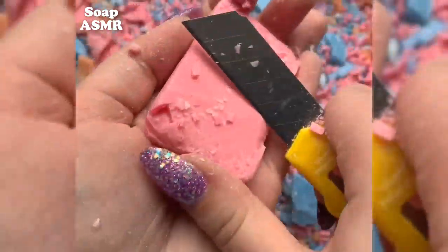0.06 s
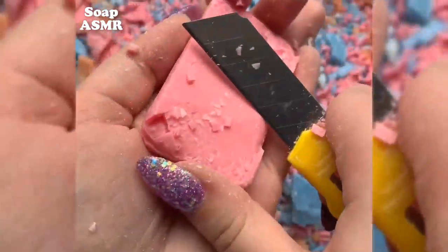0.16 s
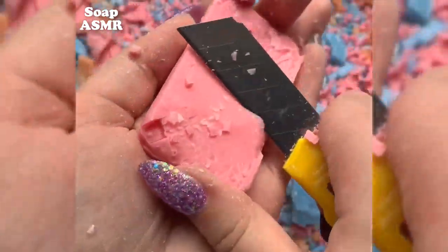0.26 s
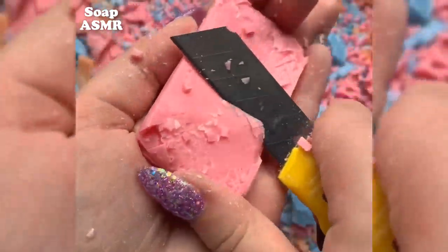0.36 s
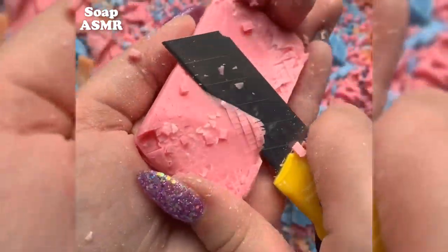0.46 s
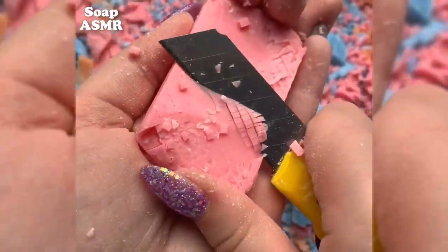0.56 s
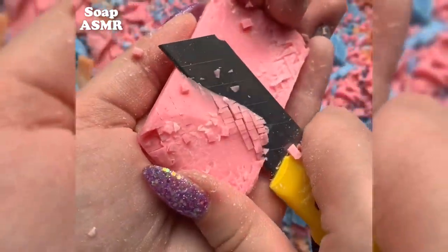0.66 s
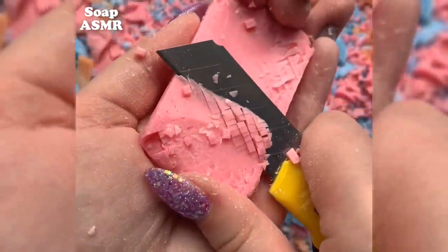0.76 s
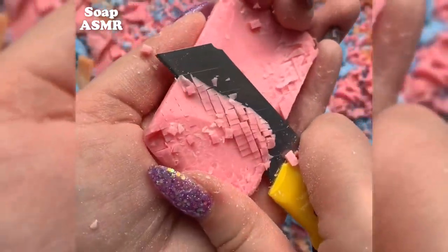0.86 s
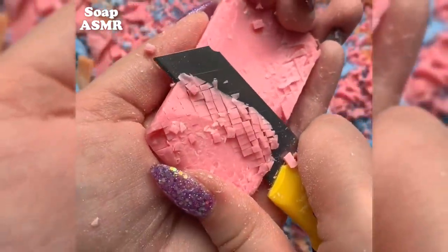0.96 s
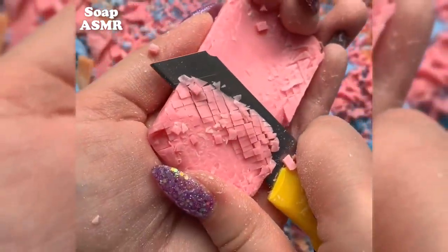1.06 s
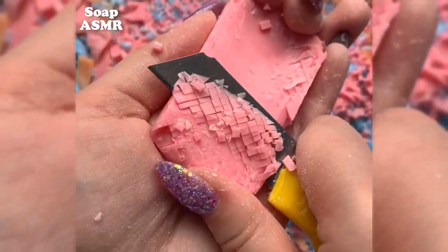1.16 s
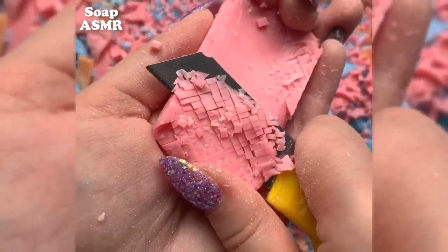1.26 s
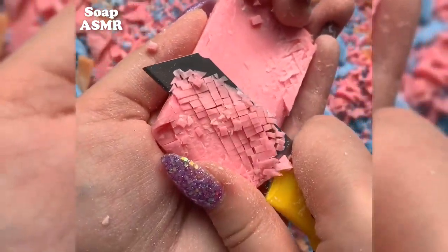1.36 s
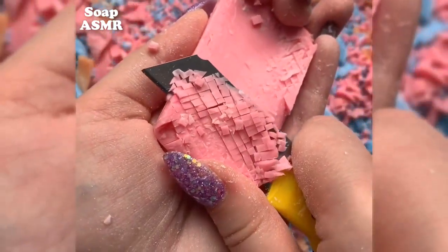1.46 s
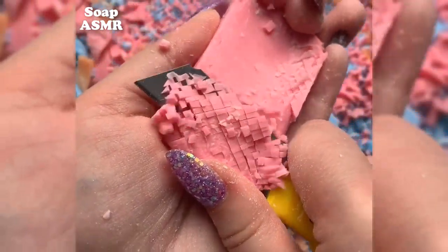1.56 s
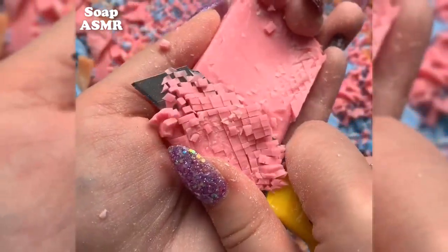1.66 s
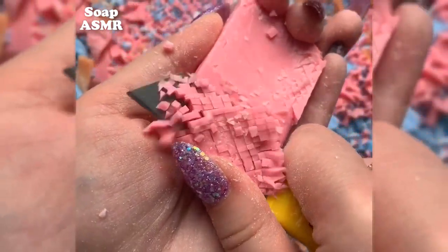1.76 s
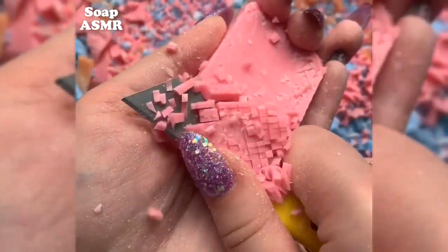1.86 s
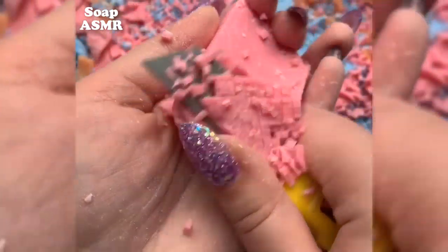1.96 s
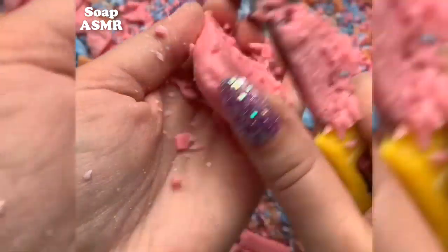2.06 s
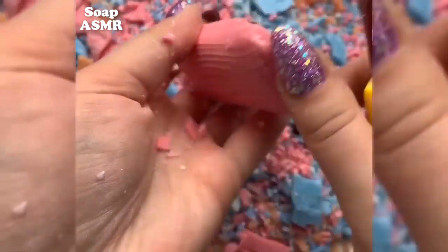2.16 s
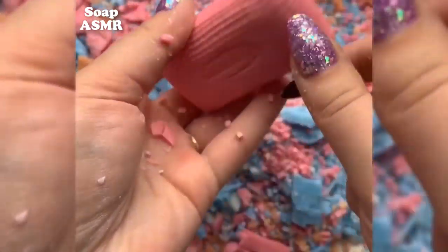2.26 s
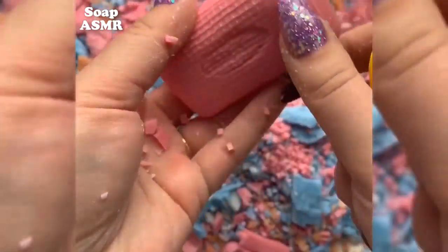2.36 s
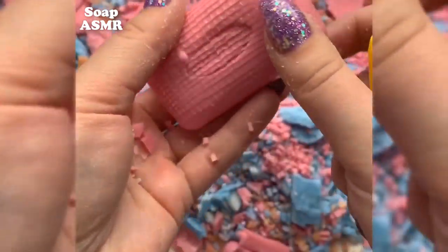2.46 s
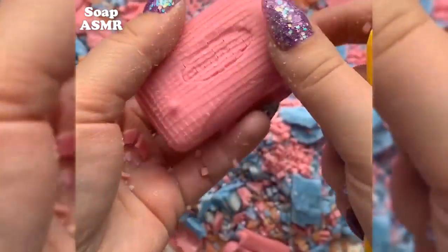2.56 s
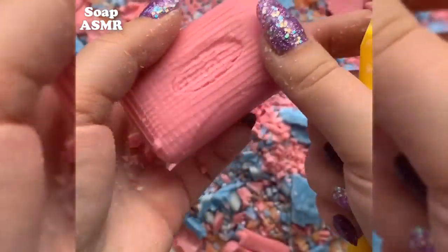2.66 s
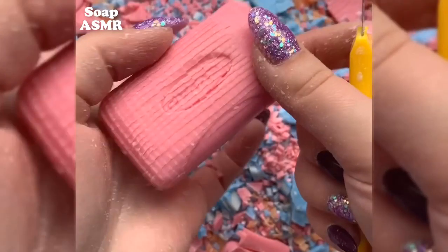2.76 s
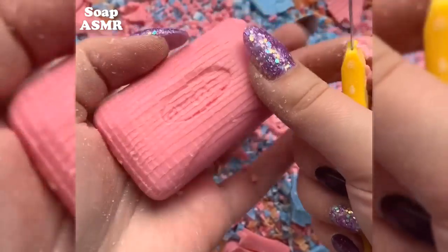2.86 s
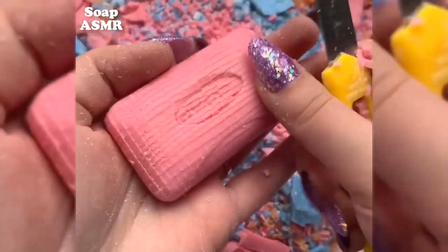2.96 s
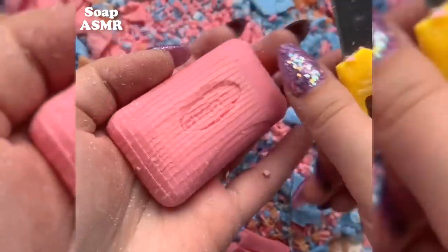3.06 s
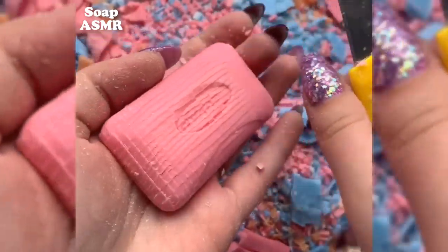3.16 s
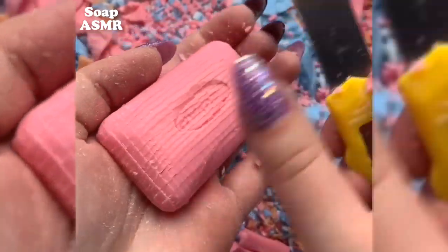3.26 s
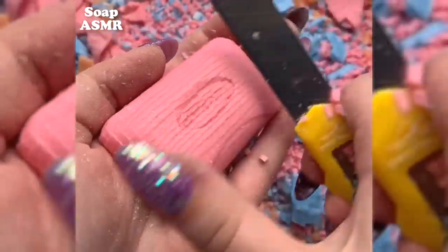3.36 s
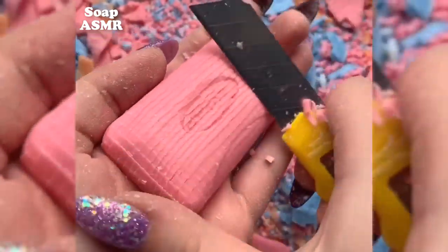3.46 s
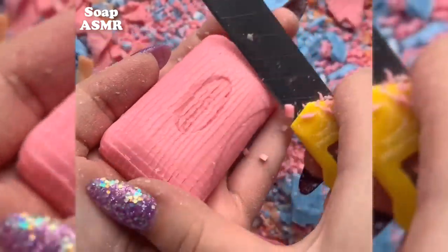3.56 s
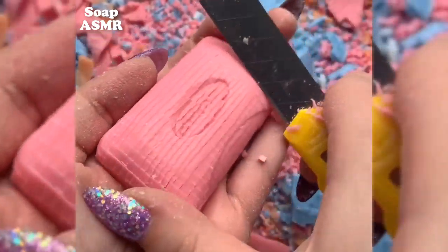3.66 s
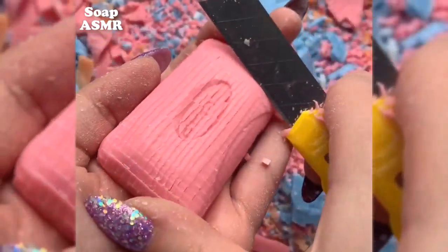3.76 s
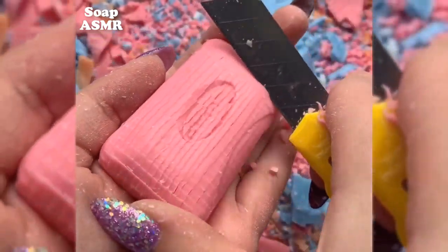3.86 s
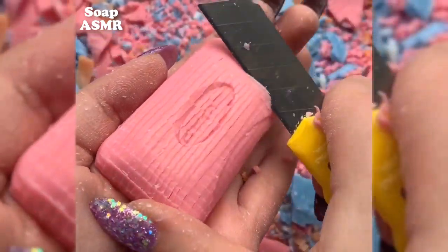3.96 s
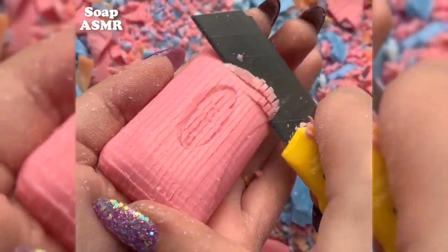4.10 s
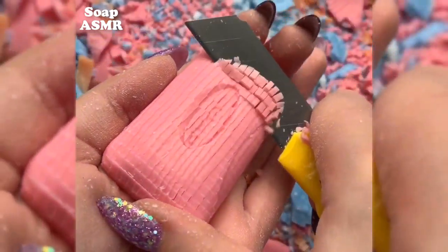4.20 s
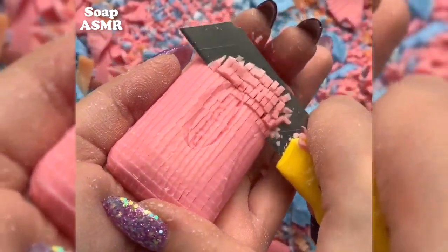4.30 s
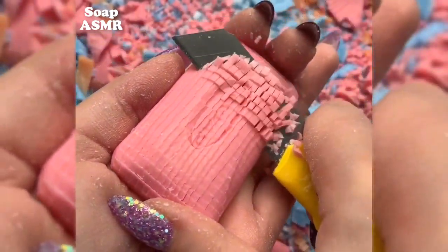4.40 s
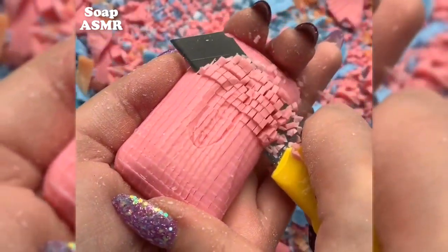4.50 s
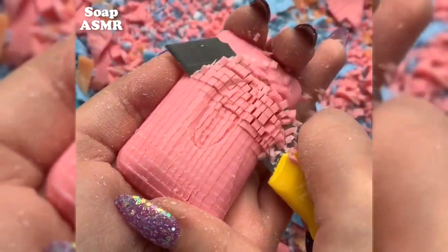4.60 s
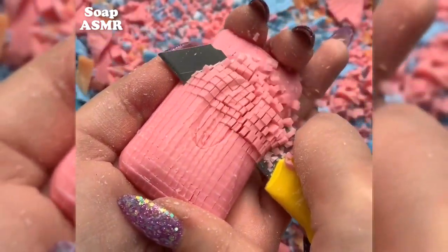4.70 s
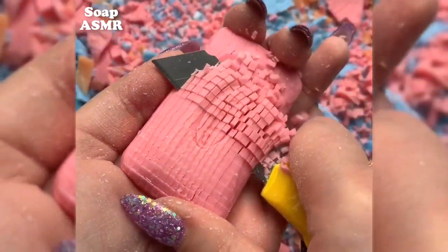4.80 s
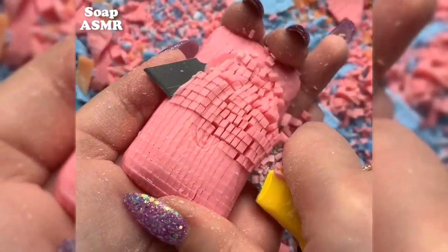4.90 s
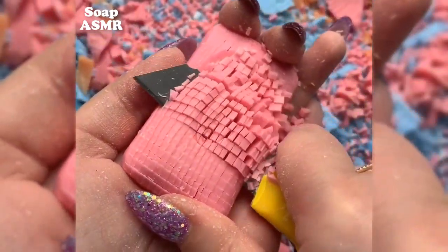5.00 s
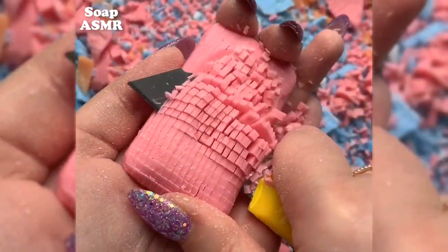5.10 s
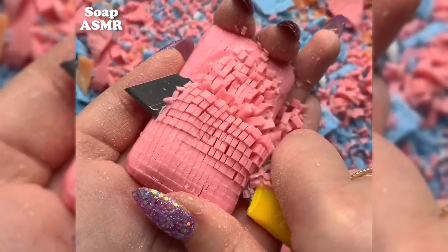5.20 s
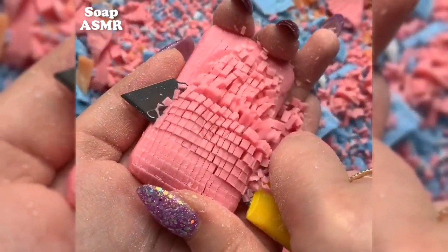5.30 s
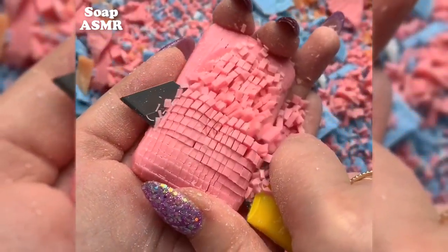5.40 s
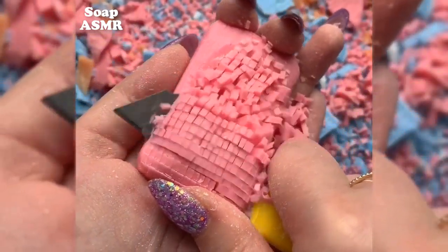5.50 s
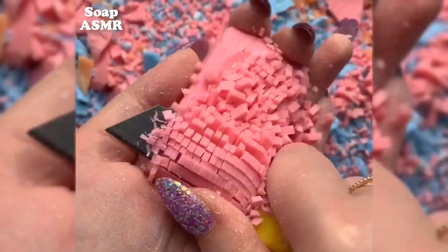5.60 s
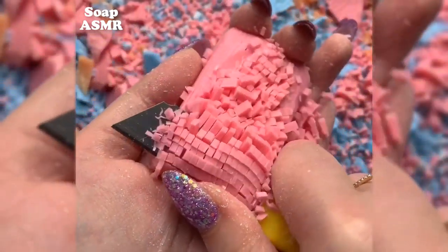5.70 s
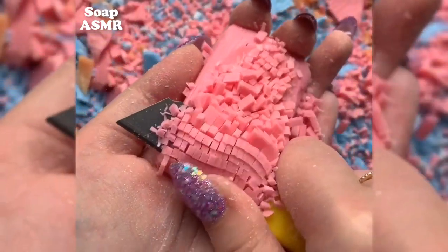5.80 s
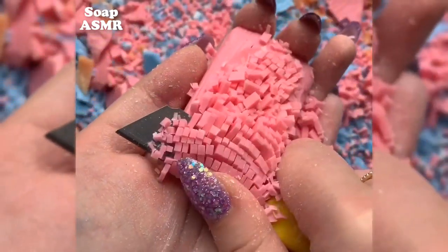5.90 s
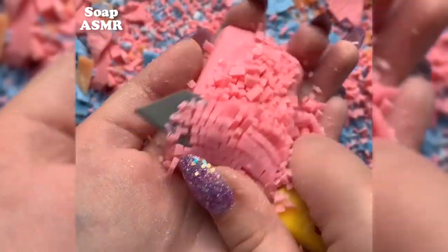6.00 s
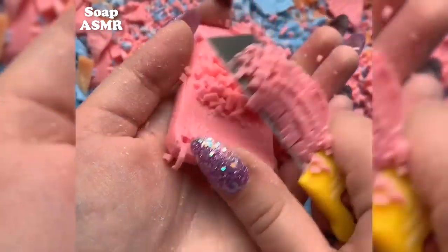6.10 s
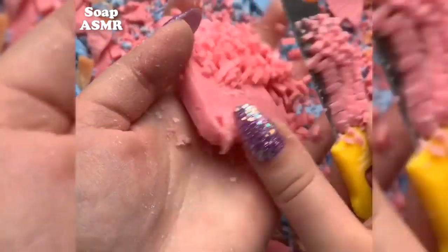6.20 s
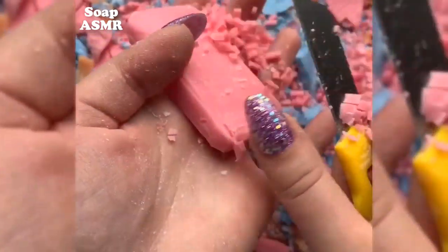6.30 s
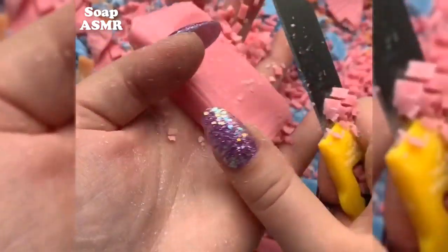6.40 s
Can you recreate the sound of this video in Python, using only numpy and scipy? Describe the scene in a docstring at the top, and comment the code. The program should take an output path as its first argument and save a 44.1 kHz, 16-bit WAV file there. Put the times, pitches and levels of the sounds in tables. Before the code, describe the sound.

Very close stereo microphones in a quiet room catch a steel blade cutting scored dry soap. A few taps lead into a short, delicate run of brittle snaps. Crumbs drop, fingers rub and the bar lands softly in the palm. After some sharper clicks, a second cut builds into a dense, bright crunch with small metallic ringing and low hand thuds, then stops, leaving rustling and ticking crumbs.

```python
"""In a quiet room, a thin steel blade shaves two scored bars of dry soap near a spaced pair of microphones.
Each cube snaps off as an impulse into the modes of edge and soap, and sets the blade's own modes ringing.
Between the cuts crumbs drop, fingers and handle tap as noise bursts into modes, and the bar lands in the palm.
Grainy noise makes the rubbing; short jolts and slower pressure swells of low noise make the hands' thuds
over a steady rumble."""
import sys
import numpy as np
from scipy import signal
from scipy.fft import rfft, irfft, next_fast_len
from scipy.io import wavfile
from scipy.ndimage import uniform_filter1d

SR = 44100
rng = np.random.default_rng(int(sys.argv[2]) if len(sys.argv) > 2 else 0)


def bounce(signal):
    """Save signal as a 16-bit WAV file at the path given by the first command-line argument."""
    frames = np.transpose(np.atleast_2d(signal))
    limited = np.clip(frames, -1, 1)
    pcm = np.round(limited * 32767).astype(np.int16)
    wavfile.write(sys.argv[1], SR, pcm)


N = 284445


def gain_of(db):
    """Logarithmic level: decibels become an amplitude factor."""
    return 10 ** (np.asarray(db) / 20)


def evened(x):
    """Power normalization: scales to rms 1 over all channels."""
    return x / np.sqrt(np.mean(x ** 2) + 1e-20)


def read_spectrum(points, hz):
    """Log-frequency interpolation: reads a curve between its listed points."""
    point_hz, value = np.transpose(points)
    return np.interp(np.log(hz + 1), np.log(point_hz + 1), value)


def follow(rows, column=1):
    """Linear interpolation: a curve's column at every sample."""
    rows = np.array(rows)
    return np.interp(np.arange(N) / SR, rows[:, 0], rows[:, column], left=rows[0, column])


def hiss(spectrum, likeness, size=1024):
    """Partial coherence: two channels of coloured noise share a part set by their likeness; rms 1."""
    hz = np.fft.rfftfreq(size, 1 / SR)
    a, b, c, d = rng.standard_normal((4 * N // size + 5, len(hz), 4)).T
    likeness = np.clip(read_spectrum(likeness, hz), -1, 1)[:, None]
    left = a + 1j * b
    right = likeness * left + np.sqrt(1 - likeness ** 2) * (c + 1j * d)
    coloured = np.array([left, right]) * gain_of(read_spectrum(spectrum, hz))[:, None]
    noise = signal.istft(coloured, nperseg=size, noverlap=3 * size // 4)[1]
    return evened(noise[:, :N])


def rings(modes, events, blow_s, spread, size=512, after=0., pitch=1):
    """Modal excitation: an uneven blow with a crumbly aftermath drives damped modes; energy 1 an event."""
    t = np.arange(size) / SR
    chance = rng.standard_normal((events, 2 * len(modes) + size))
    u = t / np.reshape(blow_s, (-1, 1))
    envelope = np.minimum(u * 4.0, 1) * (np.exp(-u) + after * np.exp(-u / 10))
    blow = chance[:, -size:] * envelope
    body = 0
    for k, (hz, width, db) in enumerate(modes):
        level = gain_of(db + 2.8 * chance[:, [2 * k]])
        shifted_hz = hz * (pitch + spread * chance[:, [2 * k + 1]])
        swell_and_die = width ** 2 * t * np.exp(-1.5 * np.pi * width * t)
        body = body + level * swell_and_die * np.sin(2 * np.pi * shifted_hz * t)
    out = signal.fftconvolve(blow, body, axes=1)[:, :size]
    return out / np.linalg.norm(out, axis=1, keepdims=True)


def place(s, sounds, rise_s=None):
    """Superposition: adds each sound with its peak at its moment, or starting rise_s ahead of it."""
    out = np.zeros(N + sounds.shape[1])
    lead = abs(sounds).argmax(1) if rise_s is None else round(rise_s * SR)
    start = np.maximum(np.round(s * SR).astype(int) - lead, 0)
    np.add.at(out, start[:, None] + np.arange(sounds.shape[1]), sounds)
    return out[:N]


LAG_S = .000257  # the left microphone is farther from the soap


def spaced(x):
    """Time-of-arrival difference: a linear phase delays the left channel; the right hears first."""
    size = next_fast_len(N)
    delay = np.exp(-2j * np.pi * np.fft.rfftfreq(size, 1 / SR) * LAG_S)
    return np.array([irfft(rfft(x, size) * delay, size)[:N], x])


def echoes(x, near_db, near_t60, far_db, far_t60):
    """Diffuse decay: hands and crumb heap scatter at once, then the room, differently in each channel."""
    t = np.arange(SR // 4) / SR
    taps = rng.standard_normal((2, len(t))) * (t > .0004)
    near = gain_of(near_db - 60 * t / near_t60)
    far = gain_of(far_db - 60 * t / far_t60)
    return x + signal.oaconvolve(x, taps * (near + far), axes=1)[:, :N]


# colour of the room's rumble: pitch_hz, level_db (per Hz, relative)
ROOM_COLOUR = [(12, -16), (20, -5.5), (151, 0.5), (351, -18.5), (2510, -26.5), (8410, -35), (9950, -54),
               (11500, -24), (15200, -36.5), (16500, -70)]
# left-right coherence of the room: pitch_hz, likeness (-1 to 1)
ROOM_LIKENESS = [(60, 0.93), (240, 0.89), (950, 0.56), (3770, -0.4), (15000, -0.072)]
ROOM_DB = -68


def room():
    """Stationary noise: a steady rumble, alike in both channels at low frequencies."""
    return gain_of(ROOM_DB) * hiss(ROOM_COLOUR, ROOM_LIKENESS, size=2048)


# when the blade is in the soap: start_s, end_s
CUTS = [(.5, 1.69), (4.17, 5.69)]


def in_cut():
    """Gating: 1 while the blade is in the soap, else 0."""
    t = np.arange(N) / SR
    return sum((t > a) & (t < b) for a, b in CUTS)


# pressure of the blade, one curve a cut: time_s, level_db (before each sound's own offset)
PRESSURE = [
    [(.5, -79), (.6, -64), (.7, -79), (.88, -87), (1.1, -65), (1.5, -77), (1.64, -66.5), (1.67, -39),
     (1.69, -59)],
    [(4.17, -53), (4.3, -53), (4.45, -39), (4.58, -45.5), (4.95, -41.5), (5.09, -31.5), (5.18, -43.5),
     (5.58, -43), (5.62, -26.5), (5.66, -19.5), (5.69, -44)],
]


def pressure():
    """Amplitude envelope: the blade's pressure as a gain, zero outside the cuts."""
    t = np.arange(N) / SR
    return sum(gain_of(follow(rows)) * (t > a) * (t < b) for rows, (a, b) in zip(PRESSURE, CUTS))


# short low thuds of the hands, during the second cut and after it: time_s, level_db (before smoothing)
JOLTS = [(4.478, -47), (4.522, -53), (4.674, -58), (4.751, -51), (4.93, -54.5), (5.078, -54), (5.166, -55),
         (5.261, -55.5), (5.408, -52.5), (5.644, -73), (5.692, -51), (5.945, -52.5), (6.43, -50)]
# colour of the hands' push: pitch_hz, level_db (per Hz, relative)
PUSH_COLOUR = [(15, -61), (25, 17.5), (54, -4.5), (162, 7.5), (198, -2.5), (375, -7), (500, -8), (650, -38),
               (1100, -120)]
JOLT_S, PUSH_DB = 0.012, -23  # time for a jolt to fall to 1/e; push relative to the blade's pressure


def thuds():
    """Amplitude modulation: short jolts and slower pressure shape low noise, almost alike in both channels."""
    t = np.arange(N) / SR
    jolts = sum(gain_of(db) * np.exp(-((t - s) / JOLT_S) ** 2) for s, db in JOLTS)
    level = gain_of(PUSH_DB) * pressure() + jolts
    return uniform_filter1d(level, 400) * hiss(PUSH_COLOUR, [(100, 0.8), (600, 0.82)])  # smoothed over 9 ms


# skin and crumbs rubbing: start_s, hold_s, level_db, dull_db (relative to level_db)
STROKES = [(1.674, 0.0087, -64, -27), (1.917, 0.022, -56.5, -34), (2.142, 0.23, -66.5, -10),
           (2.477, 0.02, -53, -8), (3.072, 0.13, -73.5, 2.5), (3.407, 0.054, -91, 17),
           (3.6, 0.061, -61, -1.5), (3.763, 0.01, -75, 14), (4.082, 0.013, -58.5, 1.5),
           (5.705, 0.01, -45, -17), (5.949, 0.01, -51, -19), (6.201, 0.34, -53, -11.5)]
RUB_RISE_DB_PER_S, RUB_FADE_DB_PER_S = 364, 256
REST_DB, REST_DULL_DB = -79, -30  # hands between strokes; their dull part relative to that


def strokes():
    """Exponential envelopes: bright and dull gains rise, hold and fade over hands never quite still."""
    start, hold, db, dull_db = np.transpose(STROKES)[:, :, None]
    t = np.arange(0, N + 64, 64) / SR
    rise_db = RUB_RISE_DB_PER_S * np.maximum(start - t, 0)
    fade_db = RUB_FADE_DB_PER_S * np.maximum(t - start - hold, 0)
    db = db - rise_db - fade_db
    bright = gain_of(REST_DB) + gain_of(db).sum(0)
    dull = gain_of(REST_DB + REST_DULL_DB) + gain_of(db + dull_db).sum(0)
    every = np.arange(N) / SR
    return np.interp(every, t, bright), np.interp(every, t, dull)


# colour of the bright rub: pitch_hz, level_db (per Hz, relative)
BRIGHT_RUB = [(1180, -56), (2000, -11.5), (6190, -1.5), (7860, -9.5), (10300, -6), (14500, -15),
              (16500, -13)]
# colour of the dull rub: pitch_hz, level_db (per Hz, relative)
DULL_RUB = [(210, -40), (350, -15), (639, -1.5), (1100, -13), (1640, 3.5), (3000, -1.5), (3900, -31),
            (6600, -120)]
CUT_BRIGHT_DB, CUT_DULL_DB = -8.0, -14.5  # parts of the blade's rub relative to its pressure


def rustling():
    """Stick-slip friction: tiny uneven slips roughen noise driven by the strokes and the blade."""
    slips_per_s, size_db, smooth = 300, 4.0, 1.1  # smooth: steady share against rms-1 slips
    sizes = gain_of(size_db * np.minimum(rng.exponential(1, N), 4))
    slips = sizes * (rng.random(N) < slips_per_s / SR)
    grain = smooth + evened(signal.lfilter([1], [1, -.985], slips))  # each slip fades over some 1.5 ms
    bright = hiss(BRIGHT_RUB, [(1000, 0.31)], size=256)
    bright[0] = spaced(bright[0])[0]
    dull = hiss(DULL_RUB, [(400, 0.99), (2000, 0.24)], size=512)
    (hands, hands_dull), blade = strokes(), pressure()
    bright_gain = hands + gain_of(CUT_BRIGHT_DB) * blade
    dull_gain = hands_dull + gain_of(CUT_DULL_DB) * blade
    return evened(grain) * (bright_gain * bright + dull_gain * dull)


# the bar turned over into the palm: time_s, energy_db
LANDING = (2.478, -17)
# modes of bar and palm: pitch_hz, width_hz, level_db (relative)
PALM = [(178.4, 66, 0), (285, 81, 0.5), (498, 60, -4)]


def landing():
    """Damped impact: a soft blow into low modes, one thump alike in both channels."""
    s, db = LANDING
    blow_s, after = .004, .4
    thump = rings(PALM, 1, blow_s, 0.018, size=8192, after=after)
    return place(np.array([s]), gain_of(db) * thump, blow_s)


def crumbs(per_s=20):
    """Random point process: stray crumbs tick under the rubbing hands, outside the cuts; rows like TAPS."""
    at = np.flatnonzero((rng.random(N) < per_s / SR) * (1 - in_cut()))
    db = 20 * np.log10(strokes()[0][at]) + 27 + 3.1 * rng.standard_normal(len(at))
    return np.transpose([at / SR, db, np.full(len(at), -22.)])


# crumbs, nails and handle knocking: time_s, energy_db (before offsets), dull_db (relative to energy_db)
TAPS = [(.017, -40, -4), (.0602, -18, -18.5), (.149, -48.5, -2), (.307, -38.5, -16.5), (.4, -46.5, -9),
        (1.8952, -26.5, -48), (1.917, -17, -22.5), (1.9404, -25.5, -25), (1.9764, -35, -39),
        (2.15, -44, -16), (2.179, -28, -26), (2.2383, -43, -6), (2.3271, -30, -43), (2.3564, -31, -20),
        (2.4117, -27, -14.5), (2.4712, -15.5, -25), (2.5547, -32, -17), (2.651, -40, -35),
        (3.01, -46.5, -5), (3.0964, -28.5, -13), (3.1771, -20, -16), (3.391, -42.5, -1.5),
        (3.4547, -40.5, 0.5), (3.5755, -8, -22.5), (3.6564, -38.5, -3), (3.714, -41, -28),
        (3.7495, -31, -8.5), (3.7818, -31, -15), (4.0645, -8.5, -14), (4.0828, -29, -15), (4.113, -26, -33),
        (5.875, -23.5, -26), (5.9181, -54, -23), (5.9392, -9.5, -25.5), (6.187, -43.5, 4),
        (6.2055, -26, -48.5), (6.244, -36, -25), (6.2605, -17.5, -51), (6.2845, -19, -41),
        (6.313, -17.5, -54), (6.3628, -20, -33)]
# modes of the crumbs: pitch_hz, width_hz, level_db (relative)
GRIT = [(3120, 1100, -10.5), (4985, 1200, -3), (7140, 2300, 2), (11635, 1300, -1), (14800, 1800, -0.5)]
# modes of the bar in the palm: pitch_hz, width_hz, level_db (relative)
KNOCK = [(750, 260, -5), (1500, 240, 0), (2050, 220, 0)]
TAP_T60_S = 0.0348  # decay time of the blow


def tapping():
    """Decaying excitation: noise bursts drive the modes of grit and, duller, of the bar; both die together."""
    s, db, dull_db = np.vstack([TAPS, crumbs()]).T
    fall_s = TAP_T60_S / np.log(1000)
    grit = rings(GRIT, len(s), fall_s, 0.1, size=4096) * gain_of(db + 2.1)[:, None]
    knock = rings(KNOCK, len(s), fall_s, 0.06, size=4096) * gain_of(db + dull_db + 6.5)[:, None]
    balance = gain_of([[1.5], [-1.5]])
    return spaced(place(s, grit, fall_s / 4)) + place(s, knock, fall_s / 4) * balance


def fine_cracks(per_s=140):
    """Random fracture: smaller cubes and hairline cracks follow the blade's pressure; rows like SNAPS."""
    at = np.flatnonzero((rng.random(N) < per_s / SR) * in_cut())
    db = 20 * np.log10(pressure()[at]) + 25 + 3.2 * rng.standard_normal(len(at))
    return np.transpose([at / SR, db])


# modes of the breaking edge: pitch_hz, width_hz, level_db (relative)
EDGE = [(11273, 540, 4), (12180, 680, 7), (13800, 1400, -45), (15370, 670, 0)]
# modes of the soap: pitch_hz, width_hz, level_db (relative)
SOAP = [(2130, 650, -12), (6145, 350, 15), (6645, 3400, 12.5), (7590, 460, -4.5), (8620, 2200, 12.5)]


def snap(db):
    """Brittle fracture: the tick of the breaking edge and the duller ring of the soap."""
    soap_wander_db = 2.5
    edge = rings(EDGE, len(db), .0001, 0.023, after=0.17) * gain_of(db - 5.0)[:, None]
    soap_db = db - 8.5 + soap_wander_db * rng.standard_normal(len(db))
    return edge + rings(SOAP, len(db), 0.00022, .04, after=0.45) * gain_of(soap_db)[:, None]


# the clearest cubes breaking off: time_s, energy_db (before offsets)
SNAPS = [(.3517, -28), (.5028, -28.5), (.5561, -24.5), (.5779, -30), (.597, -6.5), (.6101, -18),
         (.6396, -10.5), (.669, -20), (.7639, -23.5), (.78, -24.5), (.9344, -13.5), (.9722, -15),
         (1.059, -13), (1.0847, -13), (1.091, -18.5), (1.1481, -12), (1.2599, -8), (1.2837, -10.5),
         (1.2892, -13), (1.384, -14.5), (1.405, -12), (1.5504, -32), (1.6061, -25), (1.6342, -23),
         (1.6592, -13), (1.6752, -6.5), (4.1756, -28), (4.188, -30), (4.1981, -5), (4.2083, -11.5),
         (4.2628, -10.5), (4.2821, -6.5), (4.3033, -7), (4.3476, -23), (4.3658, -10), (4.3765, -10),
         (4.392, -3.5), (4.4002, -16), (4.4134, -7), (4.427, -30), (4.435, -1.5), (4.4458, -11),
         (4.4674, 3), (4.477, -3.5), (4.4912, -14), (4.505, 4.5), (4.5155, -9), (4.5268, 1.5),
         (4.5356, 6.5), (4.5677, -4.5), (4.5879, -19), (4.598, -6), (4.6104, -1.5), (4.6359, -5),
         (4.6469, 1.5), (4.6613, -0.5), (4.6877, -4.5), (4.7186, -3.5), (4.7271, 4), (4.7356, 6),
         (4.7406, 5.5), (4.7465, 1.5), (4.7528, -5.5), (4.7732, 5.5), (4.7828, -4.5), (4.8011, 1.5),
         (4.814, -2), (4.8182, -4), (4.847, -5.5), (4.8611, 4), (4.8852, 7), (4.9068, 9.5), (4.914, -3.5),
         (4.9258, 5), (4.9327, 2), (4.9382, 9.5), (4.9512, 7), (4.968, -13), (4.972, 6.5), (4.9751, 0),
         (4.9832, 0.5), (4.9946, -2), (5.0059, -1), (5.0146, 10), (5.0371, -8.5), (5.0472, 7.5), (5.058, 2),
         (5.069, 8), (5.0745, 7), (5.0789, 8.5), (5.0908, 7), (5.109, 8), (5.1395, 4.5), (5.1564, 9.5),
         (5.1661, 8), (5.1867, 1), (5.1918, -0.5), (5.2136, -1.5), (5.2301, 4.5), (5.2537, 8),
         (5.2594, 3.5), (5.263, 12), (5.2894, 7.5), (5.319, -1), (5.3256, 5.5), (5.357, 6), (5.375, -17.5),
         (5.3884, 2.5), (5.3955, 9), (5.404, 8.5), (5.4165, 6.5), (5.4473, 9.5), (5.4847, 0.5),
         (5.5074, -14), (5.5146, 7.5), (5.5229, 5.5), (5.5371, -6), (5.5537, -2), (5.5854, 8.5),
         (5.599, 4.5), (5.6074, 5), (5.6181, 9), (5.6282, 13), (5.6341, 8), (5.6481, 10.5), (5.6562, 10),
         (5.666, -6), (5.6733, -13)]
# modes of the blade: pitch_hz, width_hz, level_db (relative)
BLADE = [(4290, 240, 0), (4580, 480, -7)]
# how freely the blade rings as it sinks in: time_s, ring_db (relative to a 0 dB snap)
RING = [(.5, -11.5), (.95, -12), (1.4, -13.5), (4.2, -11), (4.5, -12), (4.62, -18), (4.75, -9.5),
        (5.1, -8.5), (5.18, -15.5), (5.42, -18.5), (5.6, -9.5), (5.66, -21.5)]
RING_LAG, RING_WANDER_DB = 0.21, 2  # the ring grows by only 1 - RING_LAG dB for each dB of snap


def cutting():
    """Airborne and blade paths: snaps reach the left later; the blade's ring reaches both in step."""
    s, db = np.vstack([SNAPS, fine_cracks()]).T
    ring_db = np.interp(s, *np.transpose(RING)) - RING_LAG * db + RING_WANDER_DB * rng.standard_normal(len(s))
    wander, late_s, aside_db, low_hz = .014, .0007, -9, 1500
    pitch = np.where(s < CUTS[0][1], 1.04, 1)[:, None]  # the blade rings a little higher in the first bar
    blade = rings(BLADE, len(s), .00012, wander, after=0.091, pitch=pitch) * gain_of(db + ring_db)[:, None]
    air = spaced(place(s, snap(db)))
    # a second, softer random draw of each snap makes the left channel partly different
    air[0] += place(s + LAG_S, snap(db + aside_db))
    balance = gain_of([[-2.5], [2.5]])
    both = air + place(s + late_s, blade) * balance
    highpass = signal.butter(2, low_hz, "high", fs=SR, output="sos")  # tiny cubes radiate little bass
    return signal.sosfilt(highpass, both)


def scene():
    """Superposition: knife work and taps with their echoes, over hands and room."""
    near_db, near_t60, far_db, far_t60 = -23, .01, -52, .12  # decay times in s
    near = echoes(cutting() + tapping(), near_db, near_t60, far_db, far_t60)
    return near + landing() + rustling() + thuds() + room()


EDGE_HZ = 16250  # upper band limit


def record(dry):
    """Saturation and band limiting: the loudest ticks flatten softly, then a low-pass filter acts."""
    top, taps, beta = .97, 161, 9
    soft = top * dry / (1 + (abs(dry) / top) ** 4) ** .25
    lowpass = signal.firwin(taps, EDGE_HZ, window=("kaiser", beta), fs=SR)
    return signal.oaconvolve(soft, lowpass[None], "same")


dry = scene()
out = record(dry)
bounce(out)
```